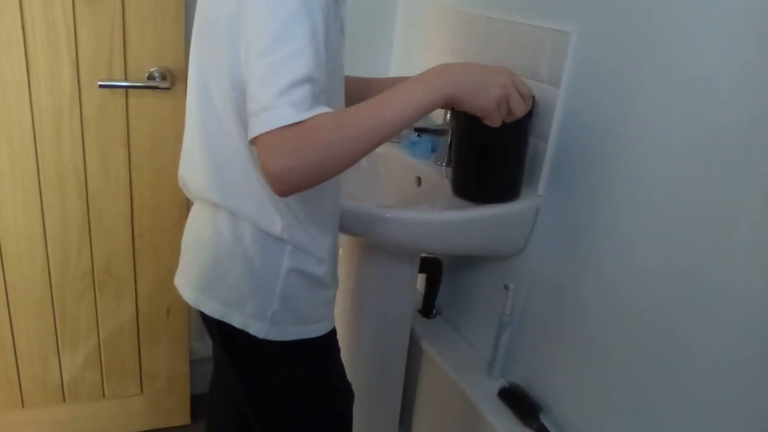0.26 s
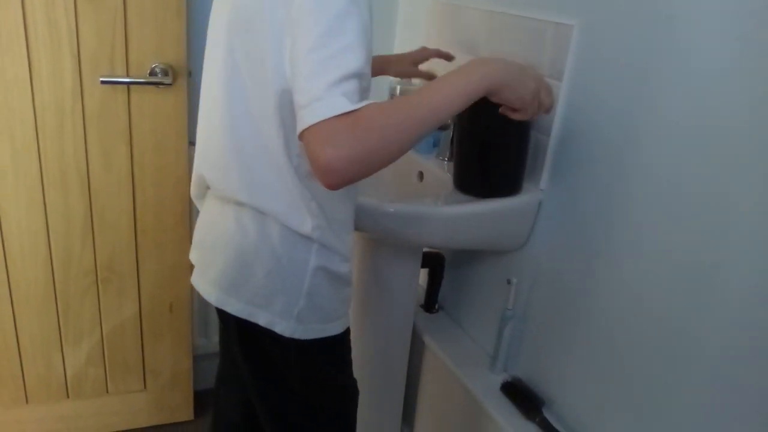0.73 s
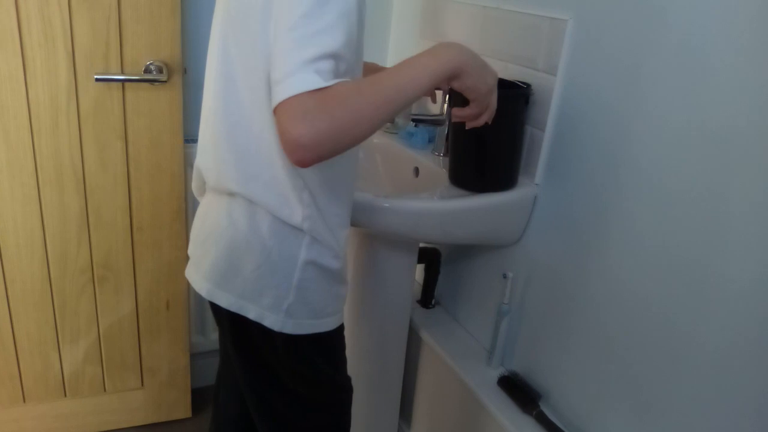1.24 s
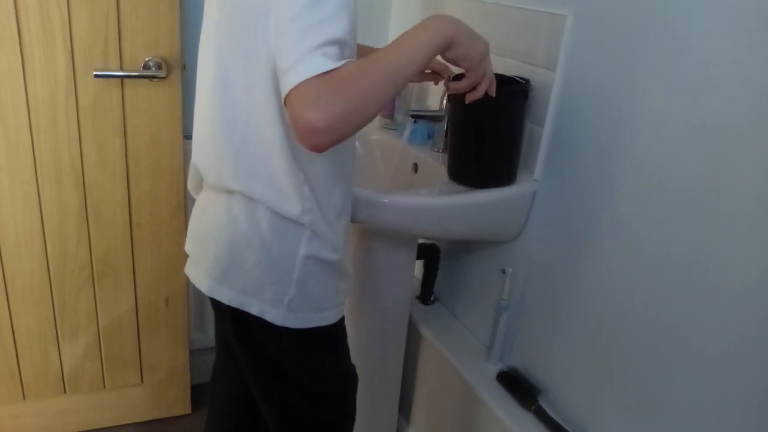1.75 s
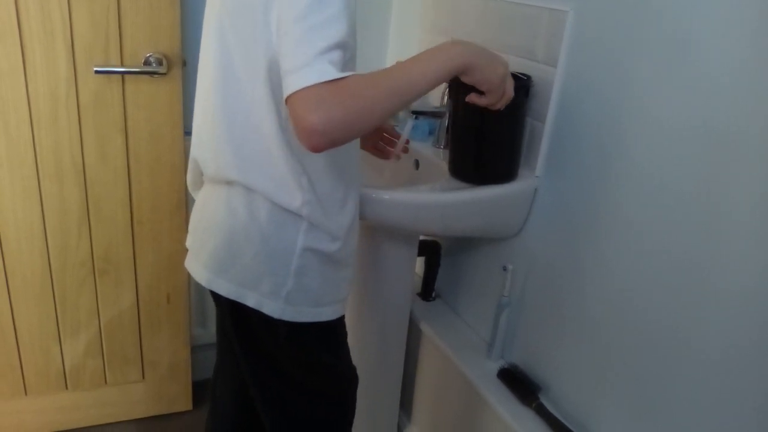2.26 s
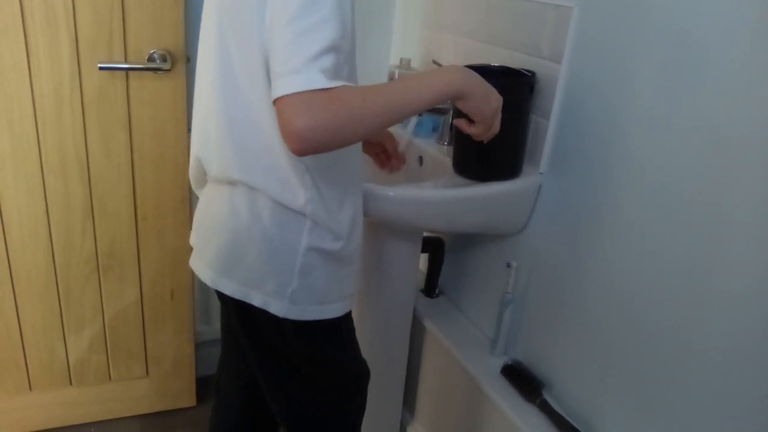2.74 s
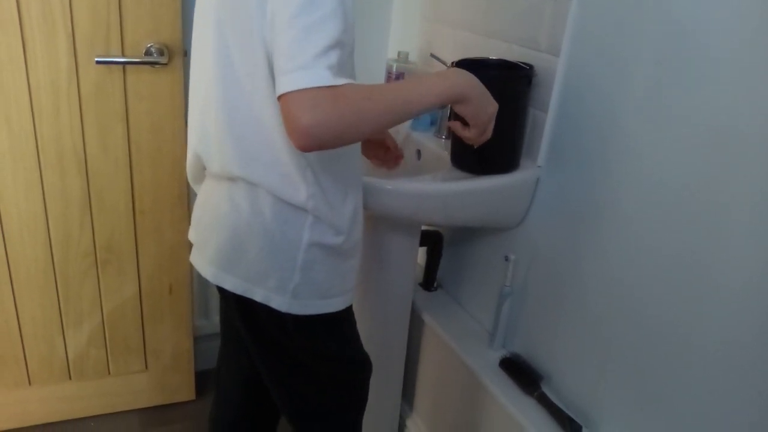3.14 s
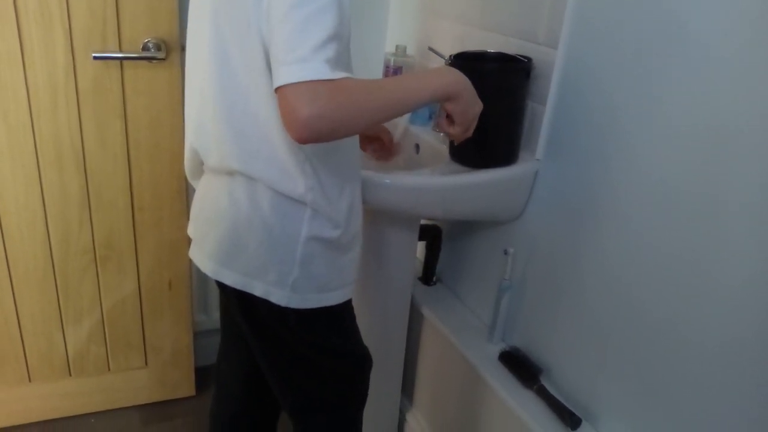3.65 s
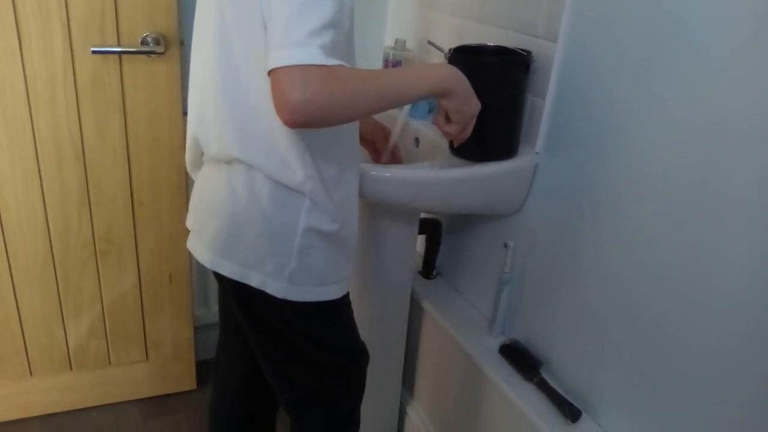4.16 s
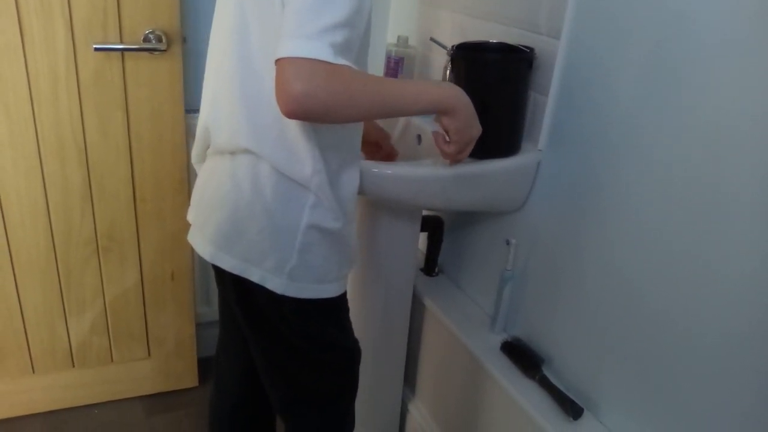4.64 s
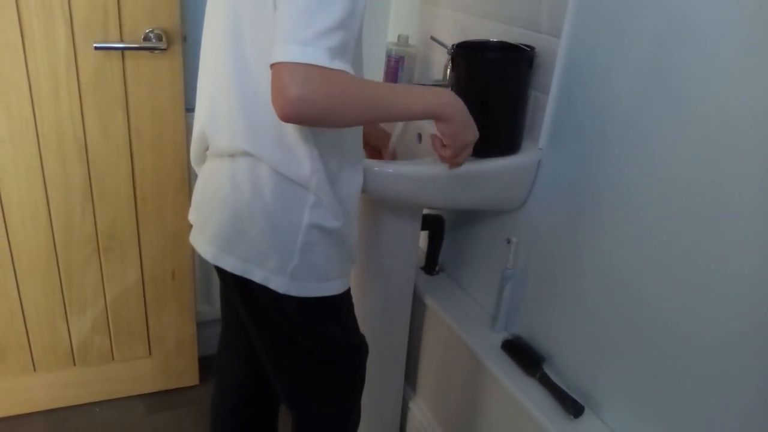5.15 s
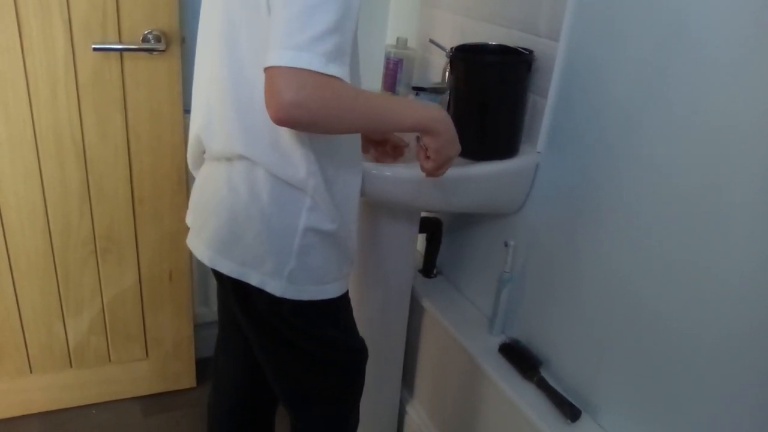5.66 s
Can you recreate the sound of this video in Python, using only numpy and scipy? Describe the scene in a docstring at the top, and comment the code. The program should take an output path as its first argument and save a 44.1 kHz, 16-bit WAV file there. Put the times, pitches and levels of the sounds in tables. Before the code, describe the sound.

In a small tiled bathroom, a plastic bin judders, knocks and scrapes in a sink, its wire handle squeaking briefly. After light touches, the tap spurts and hisses, drumming on the bare base, then plunging and gurgling as water gathers. A low hum surges in and steadies. One microphone, a little way off.

```python
"""A small tiled bathroom, one microphone a little way off. A small plastic bin is shuffled into the sink:
it judders, scuffs and knocks, slides over the glaze, and its wire handle sings briefly.
The tap spurts and opens with a bright hiss of tiny bursts; its jet drums on the bin's bare base.
Water gathers, so the drumming turns to deeper plunging and churning, with gurgles and growing splashes.
A low hum surges in underneath, then settles and grows; meanwhile a hollow note rises."""
import sys
import numpy as np
from scipy import signal
from scipy.fft import rfft, irfft
from scipy.io import wavfile
from scipy.ndimage import uniform_filter1d

SR = 44100
rng = np.random.default_rng(int(sys.argv[2]) if len(sys.argv) > 2 else 0)


def put_to_file(sound):
    """Save the sound as 16-bit audio at rate SR, in the file named by the first command-line argument."""
    columns = np.atleast_2d(sound).T  # one column per channel
    safe = np.clip(columns, -1, 1)
    whole_steps = np.round(safe * 32767)
    wavfile.write(sys.argv[1], SR, whole_steps.astype(np.int16))


N = 260190
TIME = np.arange(N) / SR
FREQS = np.maximum(np.fft.rfftfreq(N, 1 / SR), 1)
# Levels in the tables are relative: the gains named ..._db in each function trim them further.


def from_db(db):
    """Decibels to gain."""
    return 10 ** (np.asarray(db) / 20)


def rms_one(x):
    """Scale to unit rms."""
    return x / np.sqrt(np.mean(x ** 2) + 1e-20)


def track(rows, axis=1):
    """One column of a curve at every sample."""
    rows = np.array(rows)
    return np.interp(TIME, rows[:, 0], rows[:, axis])


def level(rows, axis=1):
    """Gain over time from a dB column, fading with a 20 ms time constant beyond both ends."""
    start, end = rows[0][0], rows[-1][0]
    outside = np.maximum(start - TIME, 0) + np.maximum(TIME - end, 0)
    return from_db(track(rows, axis)) * np.exp(-outside / .02)


def stroke(start, length, db, attack_s, release_db_per_s):
    """Gain of one gesture: it swells, holds until its length is up, then dies away."""
    swell = np.sin(np.pi / 2 * np.clip((TIME - start) / attack_s, 0, 1)) ** 2
    return swell * from_db(db - release_db_per_s * np.maximum(TIME - start - length, 0))


def strokes(rows, attack_s, release_db_per_s, axis=2):
    """Gain of a series of like gestures (start, length, dB columns); the strongest leads."""
    return np.max([stroke(row[0], row[1], row[axis], attack_s, release_db_per_s) for row in rows], axis=0)


def colour(x, points):
    """Give a signal a smooth spectrum that falls 40 dB an octave beyond its ends; rms 1."""
    hz, db = np.transpose(points)
    octaves, known = np.log2(FREQS), np.log2(hz)
    beyond = np.abs(octaves - np.clip(octaves, known[0], known[-1]))
    gain = from_db(np.interp(octaves, known, db) - 40 * beyond)
    return rms_one(irfft(rfft(x) * gain, N))


def drift(rate_hz):
    """Slow random wandering with rms 1."""
    return rms_one(irfft(rfft(rng.standard_normal(N)) / (1 + (FREQS / rate_hz) ** 2), N))


def grains(per_s, spread_db):
    """Random tiny impacts of uneven size and either sign; rms 1."""
    sizes = from_db(spread_db * np.minimum(rng.exponential(1, N), 4))
    sizes = sizes * rng.choice([-1, 1], N)
    return rms_one(sizes * (rng.random(N) < per_s / SR))


def resonate(x, modes):
    """Steady excitation through parallel resonances, each at its own level; rms 1."""
    out = 0
    for hz, width_hz, db in modes:
        r = np.exp(-np.pi * width_hz / SR)
        b, a = [1 - r, 0, r - 1], [1, -2 * r * np.cos(2 * np.pi * hz / SR), r * r]
        twice = signal.lfilter(b, a, signal.lfilter(b, a, x))
        out = out + from_db(db) * rms_one(twice)
    return rms_one(out)


def strike(clicks, modes, rise_s):
    """Clicks set every mode ringing; each ring takes a moment to swell to full strength."""
    out = 0
    for hz, db, t60 in modes:
        r, w = from_db(-60 / (t60 * SR)), 2 * np.pi * hz / SR
        # a faster-dying copy is subtracted, which softens the onset
        for sign, pole in ((0.98, r), (-0.78, r * np.exp(-1 / (rise_s * SR)))):
            b, a = [0, np.sin(w)], [1, -2 * pole * np.cos(w), pole * pole]
            out = out + sign * from_db(db) * signal.lfilter(b, a, clicks + 1e-18)
    return out


def blows(rows, axis=1):
    """One click per event, sized by a dB column."""
    rows, clicks = np.array(rows), np.zeros(N)
    clicks[np.maximum(rows[:, 0] * SR, 0).astype(int)] = from_db(rows[:, axis])
    return clicks


def narrow_noise(hz, width_hz, even_s=0.038):
    """A randomly driven resonance whose centre may move; its slow swells are evened out."""
    z = drift(width_hz) + 1j * drift(width_hz)
    z = z / np.sqrt(uniform_filter1d(np.abs(z) ** 2, size=int(even_s * SR)) + 1e-9)
    phase = 2 * np.pi * np.cumsum(hz * np.ones(N)) / SR
    return np.sqrt(2) * np.real(z * np.exp(1j * phase))


def bathroom(x, wet_db, t60=0.36):
    """Dense reflections from the tiles follow the direct sound after 3 ms; the power is kept about the same."""
    t = TIME[:SR // 2]
    tail = rng.standard_normal(len(t)) * from_db(-60 * t / t60) * (t > .003)
    wet = from_db(wet_db)
    reflections = signal.fftconvolve(x, tail / np.linalg.norm(tail))[:N]
    return (x + wet * reflections) / np.sqrt(1 + wet ** 2)


# Colour of the still room: (frequency [Hz], level [dB])
ROOM_TONE_COLOUR = [(150, -25), (250, -7.5), (440, -25), (513, -9.5), (723, -12.5), (984, -14), (1230, -23),
                    (2750, -20), (5950, -25.5), (9770, -44.5), (15000, -48)]
ROOM_DB = -71


def still_room(still_db):
    """Steady coloured noise: the faint tone of the room."""
    return from_db(ROOM_DB + still_db) * colour(rng.standard_normal(N), ROOM_TONE_COLOUR)


# Dull judders as the bin is steadied: (start [s], length [s], level [dB], starting pitch [Hz])
BIN_JUDDERS = [(0, 0.014, -41, 205), (0.127, 0.049, -42.5, 190), (0.255, 0.05, -49, 170),
               (0.36, 0.055, -51, 155), (0.515, 0.14, -53.5, 290), (0.66, 0.1, -52.5, 240),
               (0.816, 0.033, -60, 138), (0.92, 0.059, -57, 163), (1.011, 0.1, -54.5, 163),
               (1.121, 0.045, -45, 175), (1.291, 0.045, -58, 148), (1.454, 0.05, -45.5, 203),
               (1.51, 0.05, -40.5, 170), (2.07, 0.06, -52.5, 265)]
JUDDER_SAG_HZ_PER_S = 150
# Deep handling rumble: (start [s], length [s], level [dB])
HANDLING_RUMBLES = [(0, 0.32, -58), (0.34, 0.19, -58.5), (0.64, 0.11, -77), (0.96, 0.05, -67),
                    (1.135, 0.15, -59.5), (1.39, 0.05, -62), (1.495, 0.095, -53), (1.66, 0.12, -62),
                    (1.85, 0.043, -60), (2.43, 0.2, -71)]


def bin_shifting(judder_db=-1, rub_db=-8, rumble_db=0):
    """Slow sticking and slipping groans at a low pitch, with a soft rub around it and a deep rumble below."""
    rub_colour = [(60, -17), (120, 1), (250, 0), (400, -13), (600, -31), (1200, -65)]
    rub = from_db(rub_db) * colour(grains(740, 1.1), rub_colour)
    rumble_gain = strokes(HANDLING_RUMBLES, attack_s=0.013, release_db_per_s=258)
    out = from_db(rumble_db) * rumble_gain * narrow_noise(57, width_hz=17, even_s=0.07)
    for start, length, db, hz in BIN_JUDDERS:
        # each judder sags as it slows
        sagging_hz = hz - JUDDER_SAG_HZ_PER_S * np.clip(TIME - start, 0, 2 * length)
        groan = from_db(judder_db) * narrow_noise(sagging_hz, width_hz=9.3, even_s=.025)
        out = out + stroke(start, length, db, attack_s=0.038, release_db_per_s=305) * (groan + rub)
    return out


# The rim scuffing: (start [s], length [s], level [dB]); its colour: (frequency [Hz], level [dB])
RIM_SCUFFS = [(0, 0.025, -53), (0.045, 0.015, -63.5), (0.1, 0.036, -54.5), (0.128, 0.062, -46.5),
              (0.175, 0.041, -45), (0.47, 0.065, -71)]
RIM_COLOUR = [(650, -38), (1100, -6), (1320, -9), (1520, -1), (2140, -4.5), (3210, -6), (4080, -20.5),
              (6540, -16.5), (10000, -78), (13000, -102), (22000, -120)]
# Resonances of the bin's thin wall: (frequency [Hz], width [Hz], level [dB])
WALL_MODES = [(1210, 38, -8.5), (1530, 82, -9), (1887, 82, 0.5), (2066, 97, -2), (2215, 76, -4),
              (2460, 120, 0.5), (3020, 73, -22), (3560, 91, -16.5), (6370, 200, -13)]
# The base pushed over the glaze: (start [s], length [s], level [dB])
BASE_PUSHES = [(0.401, 0.11, -45.5), (0.67, 0.086, -45), (1.475, 0.12, -60.5)]
# One colour for each push: (frequency [Hz], level [dB])
PUSH_COLOURS = [
    [(150, -1), (250, 3.5), (370, 12), (480, 3.5), (680, 3.5), (1050, -5.5), (1400, -29), (2000, -35)],
    [(170, -25), (260, -5), (460, 6), (620, -3.5), (950, 1.5), (1350, -11), (1800, -31), (2500, -49)],
    [(200, 10), (400, 4.5), (600, -7), (800, 2), (980, -1), (1200, -19), (2000, -16)],
]
# The wire handle rubbing in its pivots: (start [s], length [s], upper tones [dB], lowest tone [dB])
HANDLE_SQUEAKS = [(0.425, 0.15, -52.5, -53), (0.55, 0.25, -60, -63), (0.8, 0.099, -69, -90)]
# The handle's upper resonances: (frequency [Hz], width [Hz], level [dB])
HANDLE_UPPER_MODES = [(4930, 42, -3), (6130, 120, -23), (7550, 47, -21), (10620, 35, -37)]
# A hand brushing the rim: (start [s], length [s], level [dB]); its colour: (frequency [Hz], level [dB])
HAND_BRUSHES = [(1.12, 0.092, -64.5), (1.165, 0.08, -59.5), (1.29, 0.094, -70.5)]
HAND_COLOUR = [(710, -43), (1200, -13.5), (2500, -2.5), (4580, -11), (5030, -18), (6590, -16), (9000, -60),
               (11700, -86), (19800, -120)]


def bin_rubbing(scuff_db=1, wall_db=-1, brush_db=0, slide_db=1, handle_db=0, breathy_db=-5):
    """Stick and slip: the rim scuffs and rings the wall, the base slides, the wire handle sings."""
    slips = grains(450, 3.8)
    rim = from_db(scuff_db) * colour(bathroom(slips, wet_db=17), RIM_COLOUR)
    rim = rim + from_db(wall_db) * resonate(slips, WALL_MODES)
    scuffing = strokes(RIM_SCUFFS, attack_s=0.011, release_db_per_s=230) * rim

    brush_gain = from_db(brush_db) * strokes(HAND_BRUSHES, attack_s=.075, release_db_per_s=150)
    brush = brush_gain * colour(bathroom(grains(400, 2.18), wet_db=11), HAND_COLOUR)

    grit = bathroom(grains(900, 1.4), wet_db=4)
    slide = 0
    for push, tint in zip(BASE_PUSHES, PUSH_COLOURS):
        slide = slide + stroke(*push, attack_s=0.04, release_db_per_s=163) * colour(grit, tint)

    upper = sum(from_db(db) * narrow_noise(hz, width_hz) for hz, width_hz, db in HANDLE_UPPER_MODES)
    # friction roughens the tones; once it stops they ring out cleaner
    roughness = from_db(breathy_db) * track([(0.82, 0.82), (0.87, .1)])
    upper = upper + roughness * narrow_noise(5060, width_hz=110)
    lowest = narrow_noise(2727, width_hz=67)
    handle = (strokes(HANDLE_SQUEAKS, attack_s=0.066, release_db_per_s=200) * upper
              + strokes(HANDLE_SQUEAKS, attack_s=0.089, release_db_per_s=230, axis=3) * lowest)
    return scuffing + brush + from_db(slide_db) * slide + from_db(handle_db) * handle


# Bin against basin: (time [s], ring level [dB], clatter level [dB])
BASIN_KNOCKS = [(0.002, -39.5, -35.5), (0.036, -48.5, -68), (0.1, -41, -46.5), (0.138, -22, -35.5),
                (0.182, -34, -31), (0.267, -31.5, -37.5), (0.356, -34, -59)]
# What the bin rings with: (frequency [Hz], level [dB], 60 dB decay time [s])
BIN_MODES = [(148, -14.5, 0.095), (213.4, -10, 0.24), (383.7, -1, 0.21), (411.6, -2.5, 0.15),
             (756, -13.5, 0.19), (797, -14.5, 0.18), (880, -20, 0.091), (935, -31, 0.15), (1090, -32, 0.08)]


def bin_knocks(ring_db=2, clatter_db=0, clatter_s=0.017):
    """Each contact rings the walls and sets off a short, dull clatter."""
    ring = from_db(ring_db) * strike(blows(BASIN_KNOCKS), BIN_MODES, rise_s=0.013)
    decay = np.exp(-1 / (clatter_s * SR))
    clatter_gain = signal.lfilter([1], [1, -decay], blows(BASIN_KNOCKS, axis=2) + 1e-18)
    burst = clatter_gain * grains(5000, 1.4)
    clatter_colour = [(100, 24), (250, 6.5), (600, 2), (850, 12.5), (1200, -5.0), (2300, -5.5),
                      (4000, -14), (6500, -29), (9000, -44)]
    clatter = np.std(burst) * colour(burst, clatter_colour)
    return bathroom(ring, wet_db=-3.5) + bathroom(from_db(clatter_db) * clatter, wet_db=-5)


# Small touches on plastic and metal: (time [s], pitch [Hz], level [dB])
TOUCH_TICKS = [(0.099, 2290, -32.5), (0.645, 6600, -60), (0.795, 5350, -45), (1.345, 3500, -50.5),
               (1.545, 4300, -59), (1.66, 6100, -59), (1.665, 3500, -57)]


def touches(touch_db=0, t60=0.03, fidget_db=-78):
    """Light contacts ping briefly and hang in the room; fingers add fainter ones at random."""
    pings = sum(strike(blows([(s, db)]), [(hz, 0, t60)], rise_s=0.0018) for s, hz, db in TOUCH_TICKS)
    pitches_hz = np.geomspace(1900, 6900, 16)
    fidgets = sum(strike(grains(5, 1), [(hz, 0, t60 / 2)], rise_s=.002) for hz in pitches_hz)
    contacts = from_db(touch_db) * pings + from_db(fidget_db) * rms_one(fidgets)
    return bathroom(contacts, wet_db=6.0, t60=0.15)


# Water starts to cover the base, takes a moment to do so, then deepens with this time constant
COVERED_S, COVERING_S, FILL_S = 2.596, 0.031, 0.64


def shallowness():
    """1 while the base is bare, falling towards 0 as water gathers."""
    return np.exp(-np.maximum(TIME - COVERED_S, 0) / FILL_S)


# The tap's flow spurts, opens fully and settles: (time [s], hiss level [dB])
TAP_FLOW = [(1.745, -89.5), (1.772, -54), (1.79, -44), (1.862, -46), (1.882, -35.5), (1.952, -42.5),
            (2.108, -33.5), (2.348, -33.5), (2.47, -36.5), (3.3, -36), (4.3, -35), (5.9, -35.5)]
# Colours of the jet's hiss and of the microphone's lift at the top: (frequency [Hz], level [dB])
JET_COLOUR = [(760, -39), (1300, -11), (1800, -9.5), (2310, -2), (4130, -5.5), (5960, 1), (6580, -0.5),
              (8340, -19), (10300, -24.5), (13800, -31.5)]
MIC_LIFT_COLOUR = [(13900, -21), (14500, -3), (15700, -3), (16500, -2.5)]
# Single gurgles in the gathering water: (start [s], length [s], deep plunge level [dB], splash level [dB])
WATER_GURGLES = [(2.63, 0.047, -57, -54.5), (2.7, 0.033, -49, -63), (2.875, 0.037, -55, -56),
                 (2.96, 0.062, -53.5, -76), (3.22, 0.05, -51, -61), (3.39, 0.03, -50, -58),
                 (3.595, 0.05, -40.5, -67), (4.03, 0.039, -55, -48), (4.22, 0.13, -48.5, -63),
                 (4.63, 0.061, -40, -64), (5.15, 0.045, -40, -70)]
# Colour of the splashing, which grows as the bin fills: (frequency [Hz], level [dB])
SPLASHING_COLOUR = [(300, -22), (520, 8), (700, 8.5), (1000, 7.5), (1300, -13.5), (2600, -6), (4000, -41)]
SPLASH_GROWTH_DB_PER_S = 2.1


def tap(hiss_db=0.42, mic_lift_db=-18, splash_db=-26, flutter_db=.5, body_hz=2000, thin_db=-3,
        waver_db=0.41, lumpy_db=1.3, spatter_db=3.0, spatter_hz=8000):
    """The aerated jet hisses with countless tiny bursts; coarser drops splash in the bin."""
    flow = level(TAP_FLOW) * from_db(waver_db * drift(15))
    spray = bathroom(grains(16000, 2.37) * from_db(flutter_db * drift(45)), wet_db=-7.5)
    hiss = colour(spray, JET_COLOUR) + from_db(mic_lift_db) * colour(spray, MIC_LIFT_COLOUR)
    spectrum = rfft(hiss)
    # on the bare base the hiss is thinner; the gathering water fills out its lower part
    body = irfft(spectrum / (1 + (FREQS / body_hz) ** 10), N)
    # hard plastic also spatters brighter than water does
    below_lift = 1 / (1 + (FREQS / MIC_LIFT_COLOUR[0][0]) ** 20)
    top = irfft(spectrum / (1 + (spatter_hz / FREQS) ** 10) * below_lift, N)
    hiss = hiss + (from_db(thin_db * shallowness()) - 1) * body
    hiss = hiss + (from_db(spatter_db * shallowness()) - 1) * top

    drops = colour(bathroom(grains(1200, 5.4), wet_db=10.0), SPLASHING_COLOUR)
    growth_db = SPLASH_GROWTH_DB_PER_S * (TIME - COVERED_S)
    splashing = flow * from_db(splash_db + growth_db + lumpy_db * drift(14))
    gurgling = strokes(WATER_GURGLES, attack_s=0.006, release_db_per_s=101, axis=3)
    return from_db(hiss_db) * flow * hiss + np.hypot(splashing, gurgling) * drops


# The jet drumming on the bare base: (time [s], level [dB]); the base's resonance: (time [s], pitch [Hz])
BARE_DRUMMING = [(1.876, -69), (1.91, -45), (2.04, -47.5), (2.08, -40), (2.16, -39), (2.29, -47.5),
                 (2.46, -52.5), (2.52, -75)]
BARE_PITCH = [(1.88, 451), (1.95, 420), (2.02, 392.5), (2.08, 369), (2.14, 384.3), (2.36, 386), (2.46, 413)]
# Resonances of the bin loaded with water: (frequency [Hz], width [Hz], level [dB])
LOADED_MODES = [(167, 15, -12), (243.5, 41, -13.5), (274.4, 32.4, 3.5), (335.5, 54, 0.5), (376.4, 37, -8.5),
                (448, 14.4, -2), (487, 9.5, -15)]
# A hollow note rising as the bin fills: (start [s], length [s], level [dB])
RISING_NOTE = (3.16, 0.32, -53)
RISING_HZ, RISING_HZ_PER_S = 482.3, 150


def drumming(bare_db=-1, patter_db=-3, plunge_db=-41.5, shallow_db=-24, churn_db=-55, thrum_db=-27,
             bare_churn_db=-21):
    """The jet shakes the bare base first; gathering water loads it, churns and brings deeper resonances."""
    # scattered drops patter on the base as the jet arrives and again just before water covers it;
    # in between, the full jet makes it sing
    scattered = np.clip(track([(1.9, 1), (2.0, 0.27), (2.15, 0.028), (2.34, 0.16), (2.44, 0.95)]), 0, 1)
    singing = from_db(bare_db) * narrow_noise(track(BARE_PITCH), width_hz=15.6, even_s=0.033)
    patter_modes = [(397, 100, -5), (441, 82, 0.5), (534, 53, -4)]
    patter = from_db(patter_db) * resonate(grains(1500, 1), patter_modes)
    base = np.sqrt(1 - scattered) * singing + np.sqrt(scattered) * patter

    covered = np.clip((TIME - COVERED_S) / COVERING_S, 0, 1)
    plunging = covered * from_db(plunge_db + shallow_db * shallowness())
    gurgling = strokes(WATER_GURGLES, attack_s=0.013, release_db_per_s=188)
    plunge = np.hypot(plunging, gurgling) * resonate(grains(1500, 2.3), LOADED_MODES)

    # the dry base only thrums faintly in the bass; water churns there
    bare_churn = from_db(bare_churn_db) * (TIME > BARE_DRUMMING[0][0])
    deep = from_db(churn_db) * (covered + bare_churn) + from_db(thrum_db) * level(BARE_DRUMMING)
    churn_colour = [(20, -17), (50, 1), (75, 1.5), (170, -2.5), (240, -2.5), (500, -7.5), (1000, -78)]
    churn = deep * colour(grains(500, 1.1), churn_colour)

    note_hz = RISING_HZ + RISING_HZ_PER_S * np.maximum(TIME - RISING_NOTE[0], 0)
    note_gain = stroke(*RISING_NOTE, attack_s=.06, release_db_per_s=45) * from_db(2.5 * drift(11))
    rising = note_gain * narrow_noise(note_hz, width_hz=9)
    return level(BARE_DRUMMING) * base + plunge + churn + rising


# The low hum's first surges: (start [s], length [s], level [dB])
FIRST_HUM_SURGES = [(2.68, 0.06, -48.5), (2.76, 0.16, -59), (3.225, 0.089, -50), (3.33, 0.15, -48),
                    (3.54, 0.048, -40.5), (3.65, 0.08, -46), (3.745, 0.053, -42), (3.845, 0.06, -43.5),
                    (4.01, 0.13, -47)]
HUM_HZ, HUM_SETTLES_S, HUM_ATTACK_S, HUM_GROWTH_DB_PER_S = 100.5, 4.17, 0.019, 2


def hum(hum_db=-39.0, waver_db=1.4, unsteady_db=-14):
    """A low hum comes in wavering surges at first, then settles on one pitch and slowly grows."""
    tone = np.sqrt(2) * np.sin(2 * np.pi * HUM_HZ * TIME)
    wavering = narrow_noise(97, width_hz=4.4)
    surges = strokes(FIRST_HUM_SURGES, attack_s=0.02, release_db_per_s=194) * wavering
    growth_db = HUM_GROWTH_DB_PER_S * (TIME - HUM_SETTLES_S) + waver_db * drift(11)
    settled = np.clip((TIME - HUM_SETTLES_S) / HUM_ATTACK_S, 0, 1) * from_db(hum_db + growth_db)
    return surges + settled * (tone + from_db(unsteady_db) * wavering)


def scene(still_db=-2):
    """All sources reach one microphone, which feeds both channels alike."""
    handling = bin_shifting() + bin_rubbing() + bin_knocks() + touches()
    water = tap() + drumming()
    mono = still_room(still_db) + handling + water + hum()
    return np.array([mono, mono])


def record(dry, low_hz=32, cutoff_hz=15800):
    """The microphone loses the deepest bass; the top is cut steeply."""
    dry = signal.sosfilt(signal.butter(2, low_hz, "high", fs=SR, output="sos"), dry)
    return signal.sosfilt(signal.ellip(12, .2, 80, cutoff_hz, fs=SR, output="sos"), dry)


dry = scene()
out = record(dry)
put_to_file(out)
```